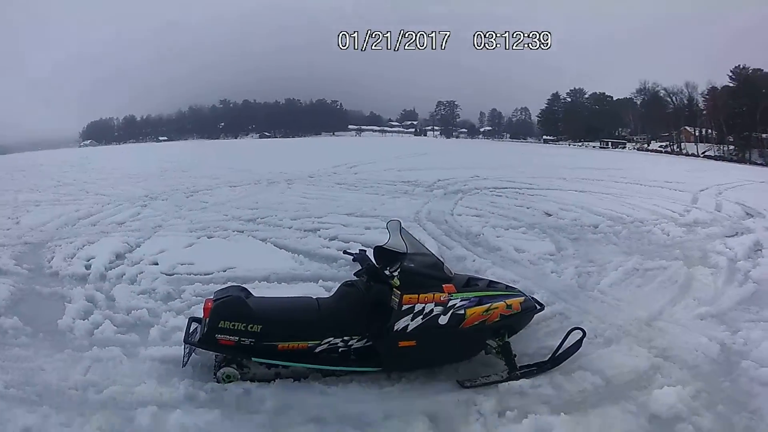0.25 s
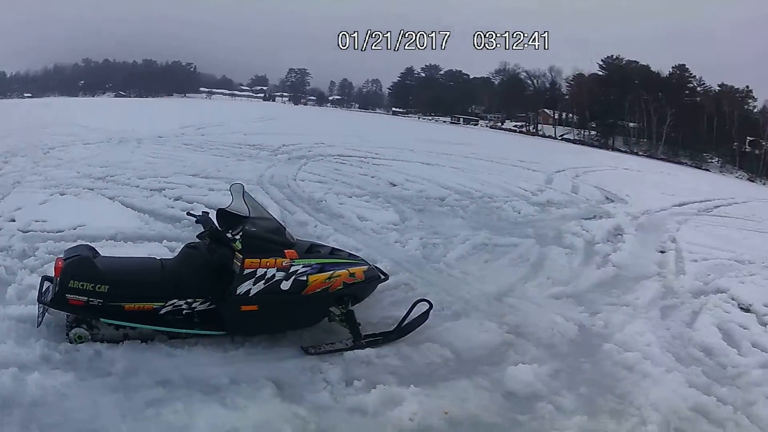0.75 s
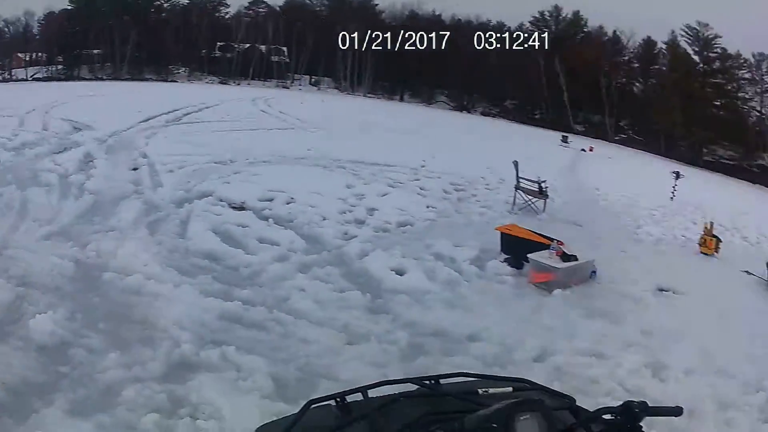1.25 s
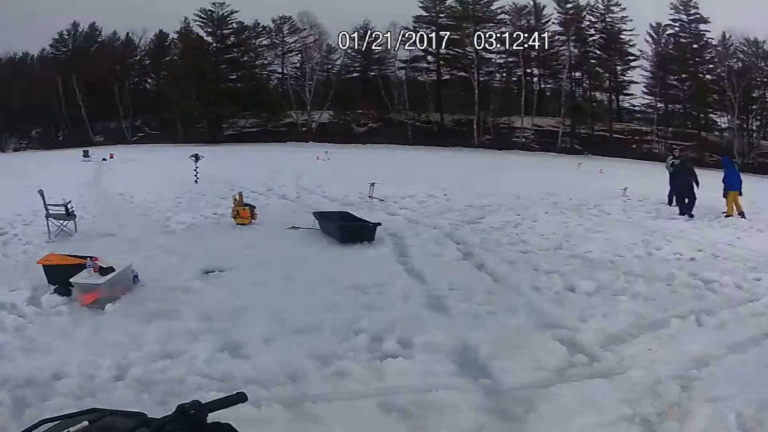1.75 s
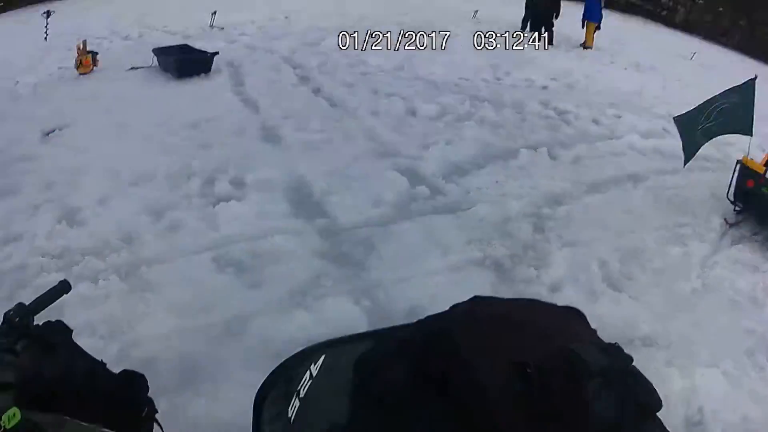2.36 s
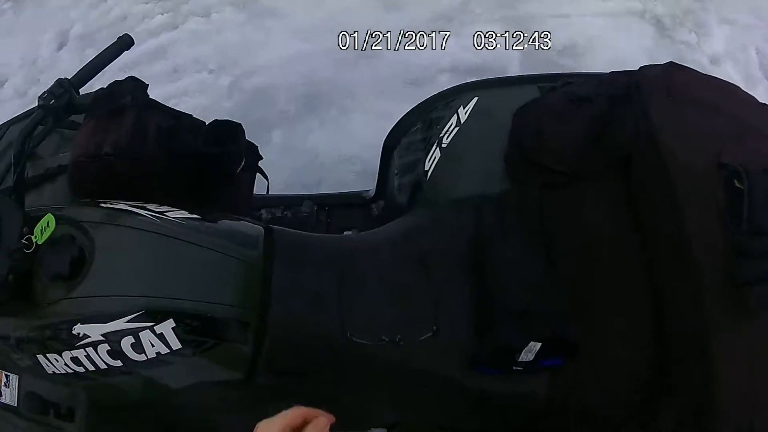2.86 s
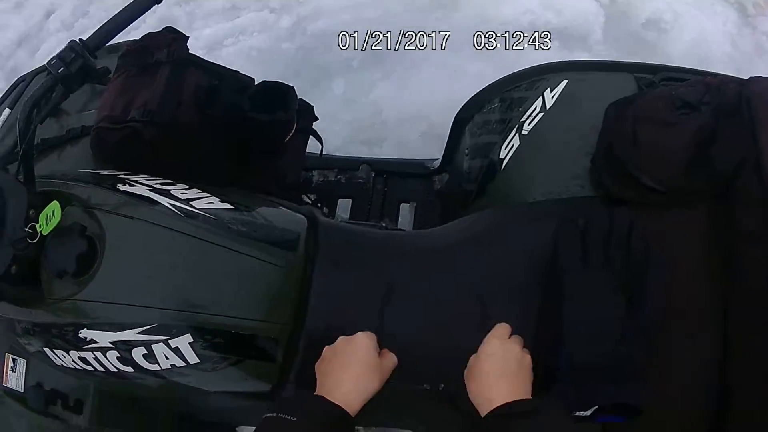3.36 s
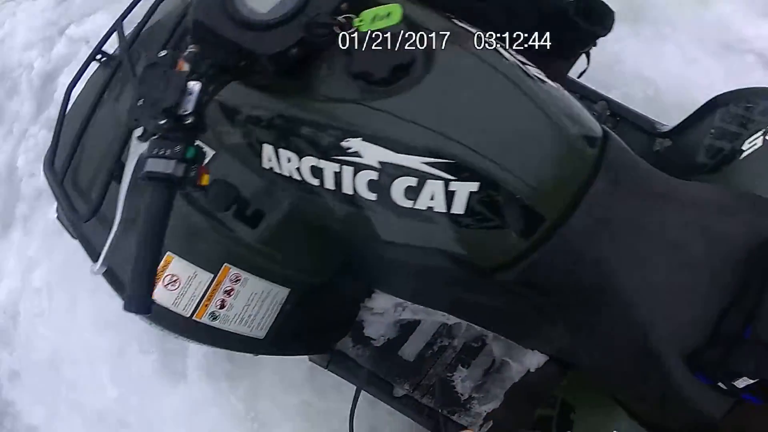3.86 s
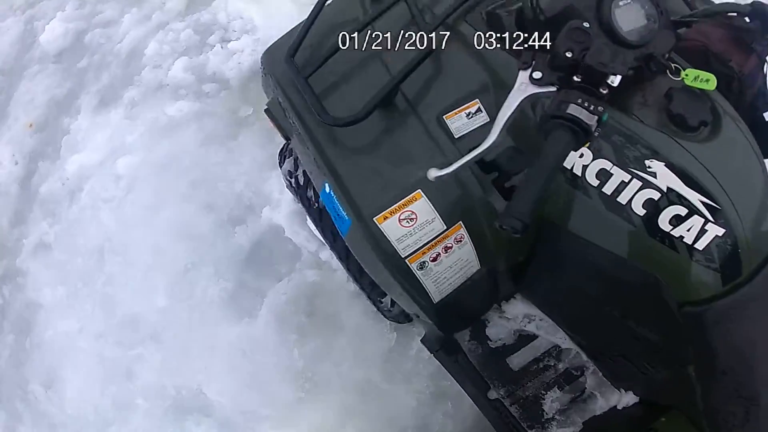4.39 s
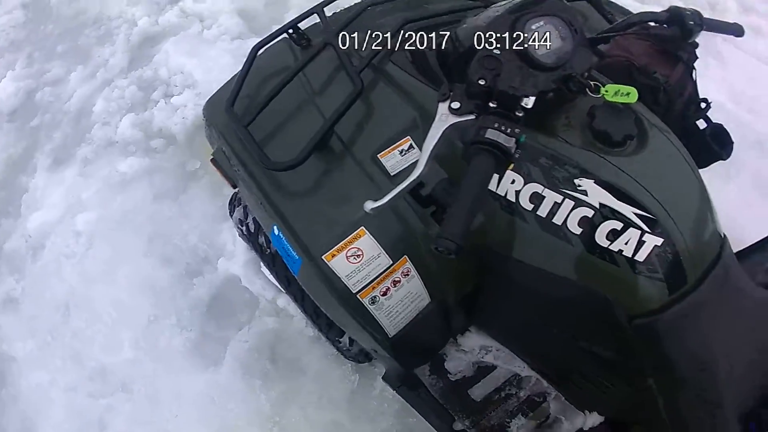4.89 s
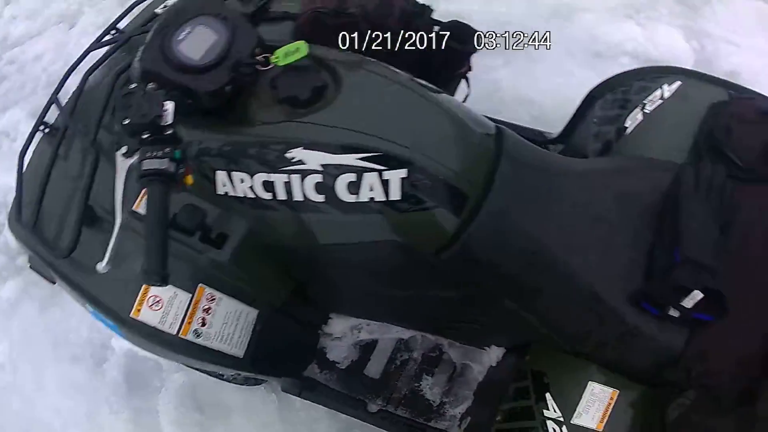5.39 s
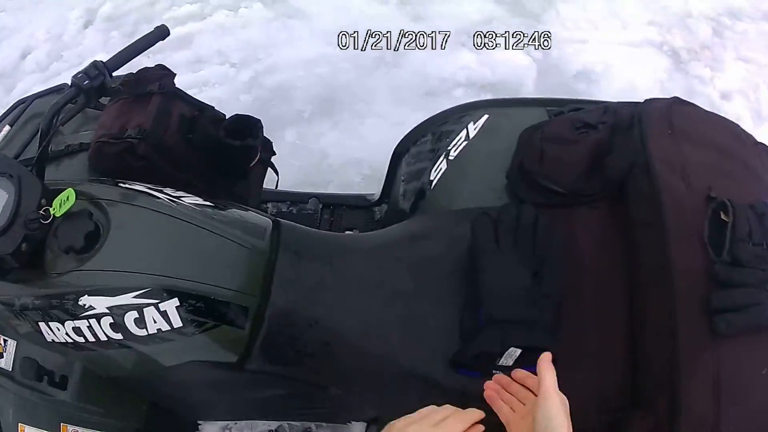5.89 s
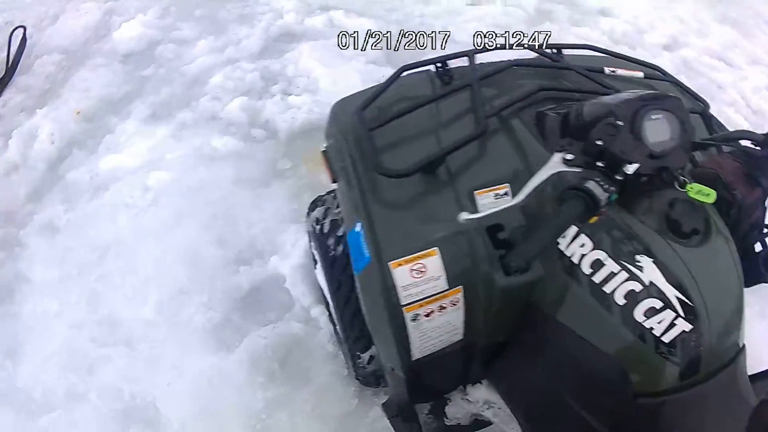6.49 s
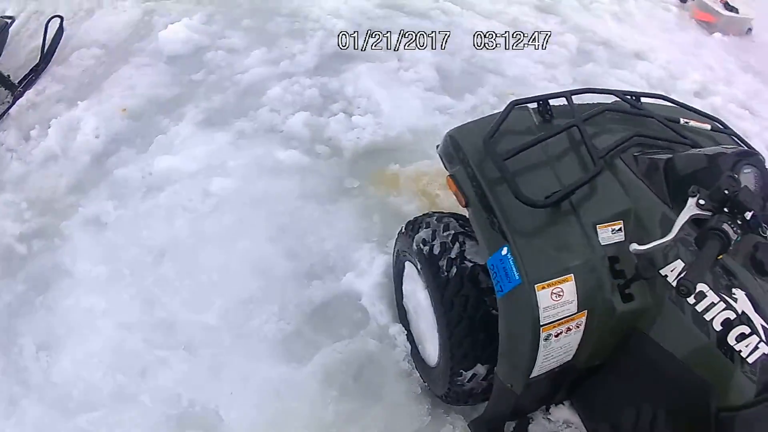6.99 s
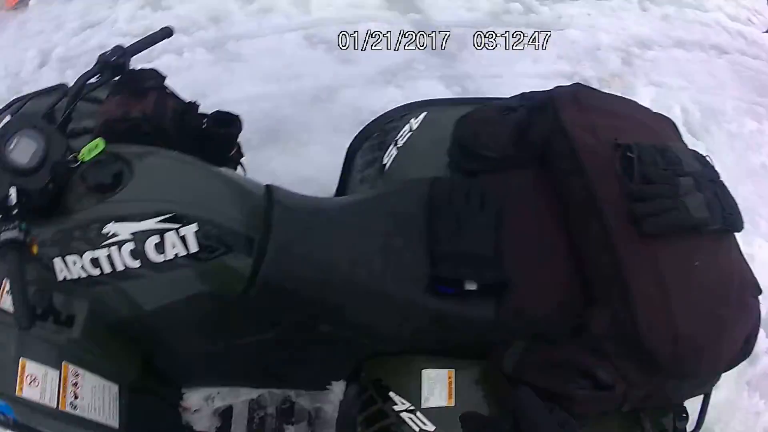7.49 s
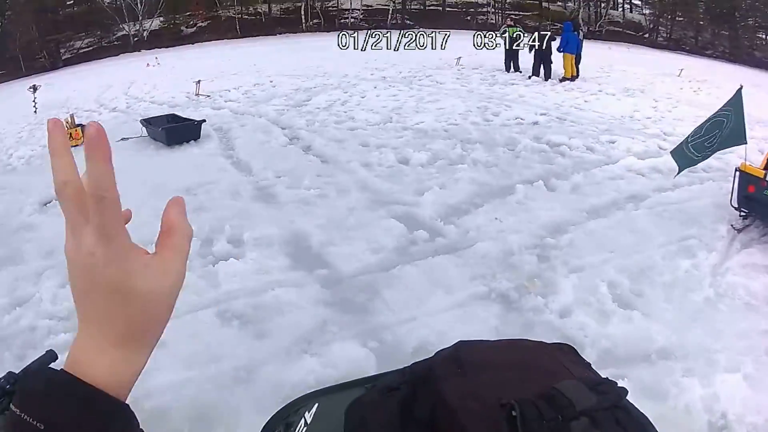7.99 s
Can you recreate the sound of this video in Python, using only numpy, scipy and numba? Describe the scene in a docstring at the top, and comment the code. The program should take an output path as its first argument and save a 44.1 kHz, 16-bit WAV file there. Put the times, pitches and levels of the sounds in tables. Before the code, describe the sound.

On an open frozen lake, a two-stroke snowmobile idles throughout without revving up. Rapid knocks, about forty-six a second, ring hollowly, while stronger pops boom and spit irregularly. The microphone sits in a closed housing on a moving head, so treble is dulled and the tone shifts as the wearer looks around. Soft low thumps mark jolts, over faint rumble and hiss.

```python
"""On a frozen lake a two-stroke snowmobile idles, heard by a microphone in a closed housing worn on the head.
Each opening of the exhaust port knocks and rings the pipe. Every few strokes a charge burns: it pops, booms and spits.
Noise shaped by resonances is the gas rushing through pipe and hood. The housing rings near 2 kHz, changes the
colour of the sound as the head turns, and thumps when it is jolted. Low rumble and hiss lie underneath."""
import sys
import numpy as np
from scipy import signal
from scipy.fft import rfft, irfft
from scipy.io import wavfile
from numba import njit

SR = 44100
rng = np.random.default_rng(int(sys.argv[2]) if len(sys.argv) > 2 else 0)


def undo_db(level):
    """Turn decibels back into plain size, where 20 dB means ten times bigger."""
    steps = np.asarray(level, float) / 20
    return 10 ** steps


def bounce(signal):
    """Save signal as a 16-bit WAV file at the path given by the first command-line argument."""
    frames = np.transpose(np.atleast_2d(signal))
    limited = np.clip(frames, -1, 1)
    pcm = np.round(limited * 32767).astype(np.int16)
    wavfile.write(sys.argv[1], SR, pcm)


N = 363825


@njit
def svf(x, hz, width):
    """State-variable band-pass with a moving centre, gain 1 at the centre."""
    y, band, low = np.empty(len(x)), 0., 0.
    for i in range(len(x)):
        g, damping = np.tan(np.pi * hz[i] / SR), width / hz[i]
        v = (band + g * (x[i] - low)) / (1 + g * (g + damping))
        band, low, y[i] = 2 * v - band, low + 2 * g * v, damping * v
    return y


def ring(x, hz, width):
    """A resonance applied twice: steep skirts, and a click becomes a burst that swells and fades."""
    hz = hz * np.ones(N)
    once = svf(x + 1e-18, hz, 1. * width)
    return svf(once, hz, 1. * width)


def struck(pulses, hz, width):
    """A struck resonance, scaled so that each burst peaks near the size of its pulse."""
    return ring(pulses, hz, width) * np.e * SR / (2 * np.pi * width)


def rush(hz, width):
    """Rushing gas or rumble: noise in a resonance, rms 1."""
    y = ring(rng.standard_normal(N), hz, width)
    return y / np.std(y)


def clicks(s, size):
    """One single-sample pulse at each time."""
    return np.bincount(np.clip(np.asarray(s) * SR, 0, N - 1).astype(int), size, N)


def swell(pulses, rise_s, fall_s):
    """An envelope that rises and dies away after each pulse."""
    t = np.arange(int(8 * fall_s * SR)) / SR
    shape = (1 - np.exp(-t / rise_s)) * np.exp(-t / fall_s)
    return signal.fftconvolve(pulses, shape / shape.max())[:N]


def spindle(pulses, hz, length_s):
    """Each pulse becomes a symmetric burst of tone, as from a puff of gas that drives a resonance and stops."""
    shape = signal.fftconvolve(pulses, np.hanning(int(length_s * SR)), "same")
    return shape * np.cos(2 * np.pi * np.cumsum(hz * np.ones(N)) / SR)


# colour of the low rumble and preamplifier hiss: f/Hz, level/dB per Hz
FLOOR_COLOUR = [(15, -88), (76, -100), (107, -86.5), (150, -102), (185, -102), (245, -110), (4000, -118),
                (5200, -124), (5900, -137), (6800, -132), (8000, -139), (9300, -129), (11400, -124),
                (15500, -129)]


def floor():
    """Low rumble and hiss: steady noise whose spectrum is given the colour of the table."""
    hz, db = np.transpose(FLOOR_COLOUR)
    f = np.arange(N // 2 + 1) * SR / N + 1
    colour = undo_db(np.interp(np.log(f), np.log(hz), db))
    return irfft(rfft(rng.standard_normal(N)) * colour, N) * np.sqrt(SR / 2)


# jolts of the housing: t/s, jolt level/dB
JOLTS = [(0.062, -53), (0.26, -49.5), (0.738, -56), (1.254, -48), (1.636, -55.5), (2.107, -58),
         (2.359, -59), (3.541, -63), (4.959, -51), (5.014, -46), (5.28, -63.5), (6.56, -65.5)]


def thumps():
    """Each jolt shakes the mount at its low mode for a while and gives a dull thud."""
    s, db = np.transpose(JOLTS)
    jolts = clicks(s, undo_db(db))
    mount = struck(jolts, 64, 18) + undo_db(-8) * swell(jolts, .03, .13) * rush(64, 18)
    thud = undo_db(-13.5) * swell(jolts, 0.0072, 0.027) * rush(160, 130)
    deep = undo_db(-19) * swell(jolts, .02, 0.11) * rush(34, 30)
    return mount + thud + deep


# how fast the engine idles: t/s, port openings per second
IDLE_SPEED = [(0, 45.419), (.75, 45.772), (1.5, 46.571), (2.25, 45.836), (3, 46.306), (3.75, 46.661),
              (4.5, 46.775), (5.25, 46.02), (6, 46.702), (6.75, 47.158), (7.5, 47.232), (8.25, 46.863)]


def crank():
    """Port openings counted since the start: the running sum of the idle speed."""
    first_phase = .373  # in strokes
    speed = np.interp(np.arange(N) / SR, *np.transpose(IDLE_SPEED))
    return first_phase + np.cumsum(speed) / SR


# the knocks set one by one, as heard in the housing: t/s, peak level/dB before the wall
HARD_KNOCKS = [(.1008, -41), (.2328, -41.5), (.2716, -40), (.5826, -39.5), (.7346, -38), (.9527, -38),
               (.9965, -37.5), (1.0836, -34), (1.1705, -35.5), (1.2572, -32.5), (1.3218, -37.5),
               (1.6875, -38), (1.751, -38), (1.816, -37.5), (1.9031, -36.5), (2.0754, -35), (2.1416, -34.5),
               (2.2071, -35), (2.2937, -38), (2.9243, -40.5), (3.0536, -38.5), (3.4633, -36.5),
               (3.5908, -34.5), (3.6988, -35.5), (3.7634, -34), (3.8061, -36.5), (3.8704, -33),
               (3.935, -34), (4.0853, -37.5), (4.171, -35.5), (4.2563, -32), (4.3412, -33), (4.4056, -31),
               (4.4697, -32), (4.5554, -33), (4.6194, -33), (4.7058, -32.5), (4.7485, -36), (4.7935, -32.5),
               (4.8344, -34.5), (5.1817, -34.5), (5.2455, -31.5), (5.8504, -38.5), (5.9147, -40),
               (6.0012, -38), (6.065, -33.5), (6.1517, -35.5), (6.2149, -35), (6.278, -34), (6.3413, -31.5),
               (6.4055, -37), (6.4905, -33), (6.64, -38.5), (6.7241, -38), (6.8085, -30.5), (6.9149, -36),
               (6.9788, -36), (7.0843, -34), (7.128, -36.5), (7.2112, -35), (7.254, -31), (7.3193, -37),
               (7.3831, -37), (7.616, -38), (7.6823, -40), (7.7622, -40), (7.8475, -36), (7.9117, -37.5),
               (7.9758, -37.5), (8.061, -38), (8.1243, -33.5)]


def ports(ring_db):
    """Even strokes, and each port's knock relative to the housing ring: by chance, or from the table."""
    hush_db = -4.5
    t = np.arange(N) / SR
    stroke_s = t[1:][np.diff(np.floor(crank())) > 0]
    time_chance, level_chance = rng.standard_normal((2, len(stroke_s)))
    s = stroke_s + .0002 * time_chance
    db = np.minimum(5 + 4 * level_chance, 9.5)
    for when, peak_db in HARD_KNOCKS:
        k = np.argmin(abs(s - when))
        db[k - 1] += hush_db  # the stroke before a hard knock is softened
        s[k], db[k] = when, peak_db - ring_db[int(when * SR)]
    return stroke_s, s, db


# the charges that burn hardest: t/s, hood slap level/dB before the hood-and-pipe cancellation and the wall
HARD_POPS = [(.033, -59.5), (.083, -52), (.234, -42.5), (.294, -47), (.404, -53), (.558, -46), (.622, -65),
             (.69, -51), (.779, -46), (.932, -44), (1.016, -49), (1.098, -58), (1.146, -46.5), (1.207, -45),
             (1.296, -40.5), (1.387, -44.5), (1.471, -42), (1.618, -38.5), (1.776, -46.5), (1.941, -45),
             (2.188, -48), (2.55, -43.5), (2.638, -45), (2.872, -45), (3.033, -48), (3.251, -53),
             (3.413, -52), (3.546, -46), (3.741, -50), (3.926, -46), (4.192, -50), (4.3, -47.5),
             (4.425, -43), (4.507, -43.5), (4.62, -43), (4.723, -46), (4.811, -43), (4.959, -49),
             (5.045, -46), (5.197, -55), (5.4, -57), (5.543, -45), (5.651, -44), (5.766, -45), (5.982, -46),
             (6.038, -39), (6.122, -53), (6.172, -58), (6.231, -50), (6.32, -47), (6.55, -46), (6.629, -47),
             (6.723, -43), (6.845, -44), (6.995, -48), (7.128, -52), (7.21, -43), (7.338, -46.5),
             (7.512, -44), (7.682, -45), (7.887, -52), (8.039, -50), (8.206, -48)]


def pops():
    """Between the table's pops other charges burn every few strokes, as soon as the cylinder has refilled."""
    refill_strokes = 3.3
    weak_slap_db, slap_scatter_db = -54.5, 3
    boom_db, boom_scatter_db = -47.5, 1  # before the tailpipe gain
    s, slap_db = map(list, zip(*HARD_POPS))
    for (start, _), (end, _) in zip(HARD_POPS, HARD_POPS[1:]):
        strokes = round((end - start) * np.interp(start, *np.transpose(IDLE_SPEED)))
        count = max(int(strokes / refill_strokes), 1)
        for k in range(1, count):
            # burn on a whole stroke
            s.append(start + (end - start) * np.ceil(k * strokes / count) / strokes)
            slap_db.append(weak_slap_db + slap_scatter_db * rng.standard_normal())
    booms_db = boom_db + boom_scatter_db * rng.standard_normal(len(s))
    return np.array(s), np.array(slap_db), booms_db


# as the head turns: t/s, housing ring f/Hz, gain from facing the hood/dB, gain from facing the tailpipe/dB
HEAD_TURNS = [(0, 2173, -3.5, -1), (.45, 2132, -6, -2), (.8, 2148, -3.5, -1.5), (1.45, 2096, 1, -3.5),
              (1.62, 2250, -3, -6), (1.95, 2237, 0.5, -6), (2.28, 2264, -2.5, -6), (2.4, 2264, -6, -12.5),
              (2.75, 2094, -5.5, -12.5), (3.45, 2128, -5, -8.5), (3.65, 2134, .5, -6),
              (4.2, 2098, -1.5, -2.5), (4.8, 2100, 2, -2), (5.25, 2122, 1, -3.5), (5.8, 2112, -6, -10),
              (6.05, 2110, -0.5, -6), (6.5, 2098, 0, -3.5), (7.25, 2091, 1, -3.5), (7.45, 2128, -3, -6),
              (7.62, 2229, -2.5, -7.5), (8.25, 2235, -2.5, -10.5)]
# low pipe, hood low, hood high, upper pipe, housing ring, treble, one row each:
# level/dB, dB per dB of hood gain, dB per dB of tailpipe gain
ZONE_LEVELS = [(-52.5, 0.38, -0.1), (-54, 0.6, 0.25), (-59.5, 0.13, -0.37), (-54.5, 0.82, -0.41),
               (-48.5, 1.07, -0.2), (-47.5, -0.03, 0.2)]


def head():
    """Turning the head shifts the housing ring and makes each zone of pitch louder or softer."""
    s, *columns = np.transpose(HEAD_TURNS)
    ring_hz, hood_gain_db, tail_gain_db = (np.interp(np.arange(N) / SR, s, c) for c in columns)
    zone_db = [db + hood * hood_gain_db + tail * tail_gain_db for db, hood, tail in ZONE_LEVELS]
    return ring_hz, tail_gain_db, zone_db


# upper edges of the first five zones: f/Hz
ZONE_EDGES = [660, 830, 1000, 1850, 2600]


def zone_at(hz, zone):
    """The moving level of the zone in which a pitch lies."""
    return zone[np.searchsorted(ZONE_EDGES, hz)]


def engine_hiss():
    """A faint steady hiss: noise in one broad treble resonance."""
    return undo_db(-80.5) * rush(4250, 1400)


def murmur():
    """A steady murmur at about the pitch of the boom: noise in a low resonance."""
    return undo_db(-68) * rush(355, 80)


def whine():
    """The 13th multiple of the stroke rate whines while it lies on the pipe's sharpest mode."""
    wander = 0.27 * rush(3, 4.1)  # slow phase drift, radians
    return undo_db(-59.5) * ring(np.cos(2 * np.pi * 13 * crank() + wander), 599, 34)


def spit(pop_s, slap_db, port_s, port_db, ring_level, tail_gain_db):
    """Burnt charges and port openings spit short puffs of treble noise."""
    from_pops = clicks(pop_s - .013, undo_db(slap_db - 25))
    from_ports = ring_level * clicks(port_s, undo_db(1.5 * port_db - 54))
    puffs = swell(from_pops + from_ports, .002, .006)
    return undo_db(.4 * tail_gain_db + 2) * puffs * rush(4600, 800)


# pipe and hood modes under the gas rush: f/Hz, width/Hz, level/dB relative to the rush in its zone
GAS_MODES = [(531.4, 90, -9), (441, 78, -9.5), (749, 253, 2), (900, 100, -6.5), (1142, 130, -14),
             (1228.3, 93, -6.5), (1360, 44, -10.5), (1509, 105, -3), (1724, 260, -5.5), (2458, 170, -19.5),
             (2787, 260, -15.5), (3078, 610, -19.5), (3673, 310, -29)]


def gas_rush(zone, blow, burn):
    """Gas noise rings pipe and hood; it swells after each knock and around each burnt charge."""
    out, gas = 0, undo_db(-7) * (1 + .26 * blow + 1.1 * burn)
    for hz, width, db in GAS_MODES:
        out = out + zone_at(hz, zone) * undo_db(db) * gas * rush(hz, width)
    return out


# what each stroke rings in the pipe: f/Hz, width/Hz, level/dB relative to the softened knock, delay t/s
PIPE_MODES = [(276.8, 30, -36, 0), (536, 127, -0.5, -.004), (547, 490, -6.5, .008), (778, 180, 1.5, -.005),
              (877, 64, 0.5, -.012), (1122, 51, -13.5, .002), (1207, 92, -12, .002),
              (1494, 120, -7.5, .001), (1716, 57, -10.5, .002), (2960, 250, -15, -.002)]


def pipe_strokes(zone, stroke_s, port_db):
    """Every stroke strikes the pipe's modes; the pipe feels the strokes more evenly than the housing does."""
    out = 0
    for hz, width, db, lag_s in PIPE_MODES:
        pulses = clicks(stroke_s + lag_s, undo_db(db + 0.42 * port_db))
        out = out + zone_at(hz, zone) * struck(pulses, hz, width)
    return out


def hood_slap(pop_s, slap_db, zone):
    """Each pop slaps the hood, at a higher pitch when the upper hood zone is the stronger."""
    high_share = zone[2] ** 2 / (zone[1] ** 2 + zone[2] ** 2)
    return struck(clicks(pop_s - .005, undo_db(slap_db)), 760 + 130 * high_share, 200)


def silencer_boom(pop_s, boom_db, tail_gain_db):
    """Each pop booms in the silencer as two symmetric bursts of low tone."""
    pulses = clicks(pop_s, undo_db(boom_db))
    main = spindle(pulses, 366.4, 0.05)
    lower = undo_db(-10) * spindle(pulses, 324.7, .035)
    return undo_db(tail_gain_db) * (main + lower)


def housing_ring(port_s, port_db, ring_hz, ring_level, blow, burn):
    """Each port gives the housing a short symmetric knock, a long thin ring and gas noise blowing down."""
    knock = spindle(clicks(port_s, undo_db(port_db)), ring_hz, 0.0075)
    # with the head lifted the ring is higher and shares its tail with a second mode above it
    lift = np.clip((ring_hz - 2170) / 70, 0, 1)
    late = clicks(port_s + .003, undo_db(port_db))
    tail = undo_db(-7.5 - 4.6 * lift) * struck(late, ring_hz, 79)
    upper_tail = lift * undo_db(-19) * blow * rush(2385, 180)
    gas = (undo_db(-18) + undo_db(-17.5) * blow + undo_db(-9) * burn) * rush(ring_hz, 300)
    return ring_level * (knock + tail + upper_tail + gas)


def engine():
    """Knocks and gas rush ring the pipe, the hood and the housing; burnt charges boom and spit."""
    ring_hz, tail_gain_db, zone_db = head()
    zone = [undo_db(db) for db in zone_db]
    stroke_s, port_s, port_db = ports(zone_db[4])
    pop_s, slap_db, boom_db = pops()
    # envelopes of the gas: after each knock, and around each burnt charge
    blow = swell(clicks(port_s, undo_db(port_db)), 0.0012, .015)
    burn = swell(clicks(pop_s - .014, np.ones(len(pop_s))), .006, .016)
    body = gas_rush(zone, blow, burn) + pipe_strokes(zone, stroke_s, port_db)
    body = body + housing_ring(port_s, port_db, ring_hz, zone[4], blow, burn)
    body = body + hood_slap(pop_s, slap_db, zone)
    # hood and pipe cancel each other in a narrow band
    body = body - 0.55 * ring(body, 650, 70)
    body = body + silencer_boom(pop_s, boom_db, tail_gain_db)
    body = body + spit(pop_s, slap_db, port_s, port_db, zone[4], tail_gain_db)
    return body + murmur() + whine() + engine_hiss()


def scene():
    """Floor, jolts and engine at one microphone; the housing wall shuts out the engine's treble."""
    wall = signal.butter(8, 4620, fs=SR, output="sos")  # low-pass, Hz
    return (floor() + thumps() + signal.sosfilt(wall, engine()))[None]


def band_limit(x):
    """A steep low-pass at the top of the band."""
    return signal.sosfilt(signal.butter(12, 15720, fs=SR, output="sos"), x)


def record(dry):
    """Turns the finished mix into the sound that is written out."""
    return band_limit(dry)


dry = scene()
out = record(dry)
bounce(out)
```